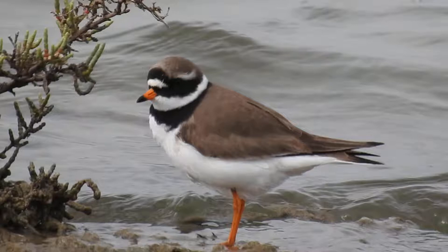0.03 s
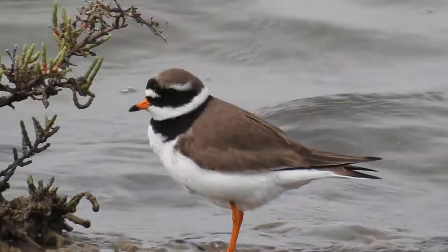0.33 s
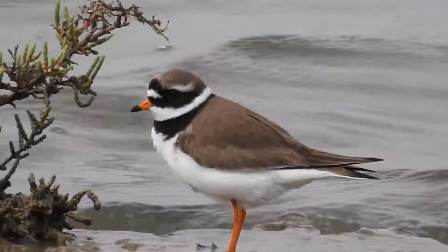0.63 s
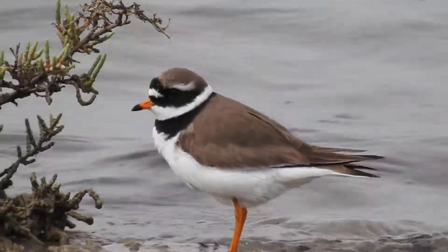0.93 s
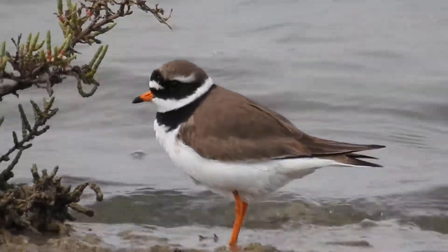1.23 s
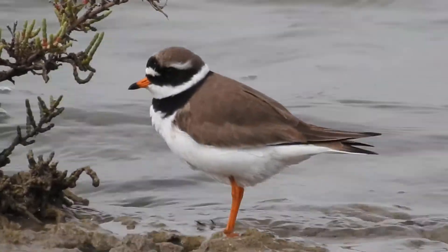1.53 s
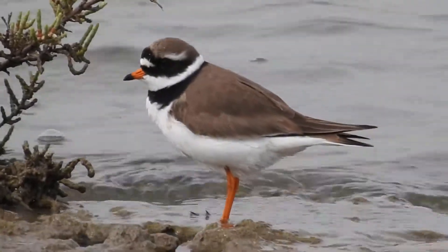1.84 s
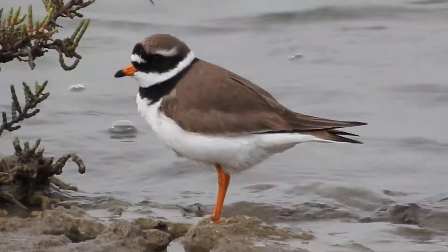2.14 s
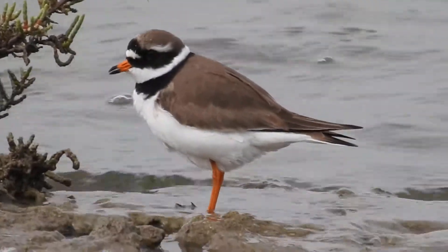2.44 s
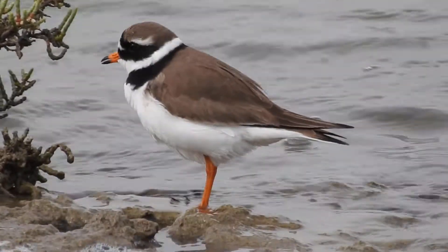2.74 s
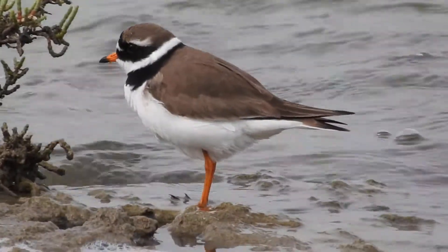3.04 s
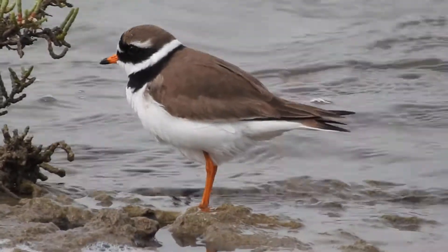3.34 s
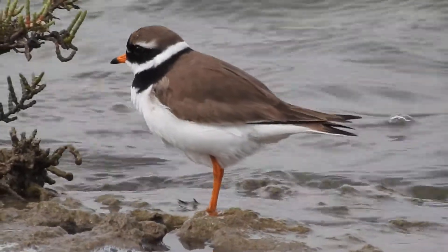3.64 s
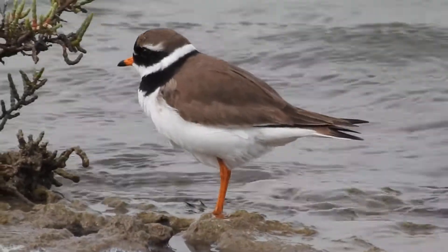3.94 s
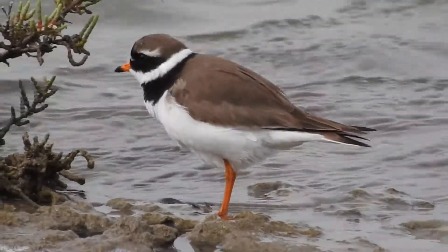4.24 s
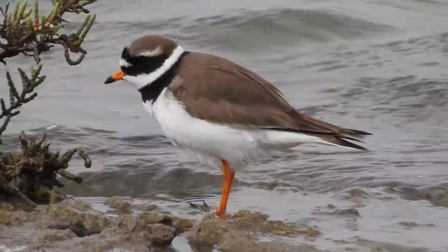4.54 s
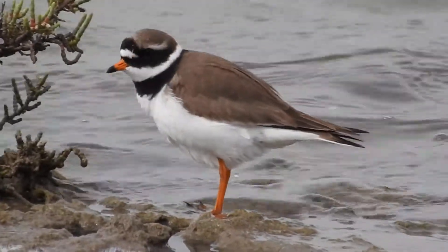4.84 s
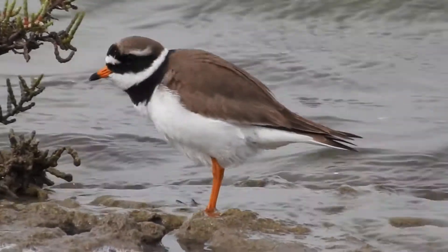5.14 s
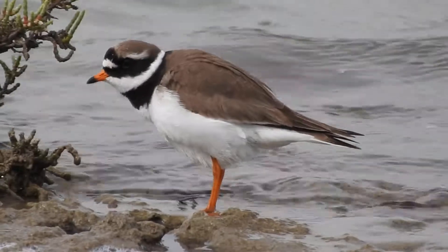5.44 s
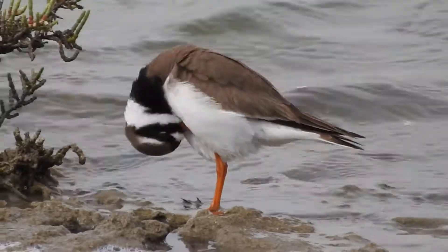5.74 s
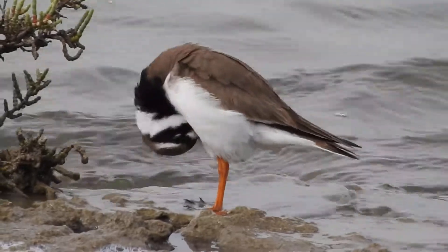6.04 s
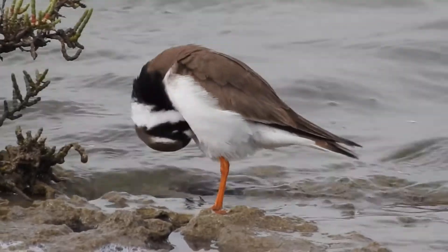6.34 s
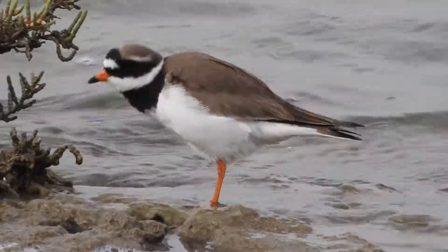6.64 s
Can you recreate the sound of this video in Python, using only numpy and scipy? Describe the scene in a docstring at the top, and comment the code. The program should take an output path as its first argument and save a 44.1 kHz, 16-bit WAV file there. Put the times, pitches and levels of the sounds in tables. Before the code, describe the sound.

Wind buffets the microphone in uneven gusts while wavelets wash a shore and small birds chirp far off.

```python
"""Wind on a shore

Gusts at the two ports of a microphone rumble, flutter, rasp and push a limiter. Hollow knocks sound
during them, and thin dry ticks come with the strongest. Wavelets wash over mud and stones, with ringing
bubbles, fizzing foam and spitting drops. Some way off, small birds chirp, buzz and whistle."""
import sys
import numpy as np
from scipy import signal
from scipy.fft import rfft, irfft, next_fast_len
from scipy.io import wavfile
from scipy.ndimage import uniform_filter1d

SR = 44100
rng = np.random.default_rng(int(sys.argv[2]) if len(sys.argv) > 2 else 0)


def waveform_to_disk(signal):
    """Save audio, clipped to [-1, 1], as 16-bit WAV at the path in sys.argv[1]."""
    frames = np.transpose(np.atleast_2d(signal))
    scaled = np.clip(frames, -1, 1) * 32767
    samples = np.round(scaled).astype(np.int16)
    wavfile.write(sys.argv[1], SR, samples)


N = 298998

# Levels in the tables are relative: each source applies its own gain.
# Gusts at the microphone: start_s, length_s, rumble_db, flutter_re_rumble_db
GUSTS = [(0.067, 0.072, -29, -21), (0.15, 0.052, -11.5, -9), (0.199, 0.114, -16, -0.5),
         (0.321, 0.14, -15, -3), (0.509, 0.029, -18, 0.5), (0.55, 0.07, -15.5, 1),
         (0.773, 0.064, -30.5, -1), (0.822, 0.039, -18, -1.5), (0.87, 0.075, -17, -4),
         (1.221, 0.052, -17.5, -9), (1.461, 0.047, -16, -5.5), (1.518, 0.063, -16.5, -2.5),
         (1.613, 0.058, -16, -8), (1.696, 0.076, -26.5, -2), (1.763, 0.1, -15.5, -9),
         (1.901, 0.14, -14.5, -7), (2.037, 0.067, -26.5, -21), (2.162, 0.078, -34.5, -2.5),
         (2.359, 0.034, -29, -5), (2.423, 0.026, -14.0, -0.5), (2.526, 0.038, -23.5, -9),
         (2.598, 0.05, -12.5, -10), (2.685, 0.1, -22.5, -15), (2.788, 0.05, -10, -13),
         (2.85, 0.036, -10.5, -12.5), (2.946, 0.15, -18.5, -4.5), (3.05, 0.097, -10.5, -9),
         (3.22, 0.056, -21.5, -6), (3.306, 0.085, -23.5, -3), (3.359, 0.029, -11.5, -7.5),
         (3.444, 0.091, -16, -4.5), (3.527, 0.13, -19.5, -4.5), (3.71, 0.062, -20.0, -4.5),
         (3.792, 0.036, -23.5, -7.5), (3.875, 0.057, -20, 0), (4.291, 0.03, -14.5, -5.5),
         (4.346, 0.015, -9.5, -8.5), (4.402, 0.12, -15.5, 0), (4.576, 0.089, -18.0, -0.5),
         (4.686, 0.056, -20.5, -0.5), (4.788, 0.046, -19, -1), (4.847, 0.022, -15.5, -2.5),
         (4.969, 0.023, -25, -13), (5.108, 0.038, -26, -11), (5.193, 0.052, -28.5, -3),
         (5.335, 0.058, -18.5, -5.5), (5.481, 0.019, -22, -8), (5.552, 0.086, -18.5, -10),
         (5.691, 0.02, -25, -12), (5.896, 0.1, -28.5, -1), (6.012, 0.109, -31.0, -6),
         (6.401, 0.021, -20, -25), (6.458, 0.06, -19, -10.5), (6.532, 0.096, -28.5, -9)]
# Short hollow knocks during gusts: start_s, level_db, left_minus_right_db, pitch_hz
KNOCKS = [(0.168, -25, 5, 740), (0.229, -23, -20.5, 945), (0.434, -19, 1, 754), (0.454, -13.5, -18, 1096),
          (0.532, -15.5, -19.5, 790), (0.593, -17.5, -11, 924), (1.633, -21, -12, 660),
          (1.97, -20.5, -2, 940), (2.006, -19, 13, 685), (2.866, -21, -3, 1050), (3.1, -17.5, -20, 1130),
          (3.115, -14, -5, 810), (3.364, -20.5, 6, 634), (3.38, -12.5, -7, 640), (3.624, -16, -16, 680),
          (3.745, -21.5, -3, 690), (3.897, -18, -5, 680), (4.319, -20, 3, 670), (4.364, -15.5, 6.5, 690),
          (4.415, -24, 7, 850), (4.484, -15, 3, 650), (4.649, -18.5, -4, 950), (4.708, -23, 1, 700),
          (4.854, -20.5, -9.5, 1130), (5.361, -27, 2, 974), (5.961, -21, -19, 1045), (6.105, -21, -12, 703)]
# Spectra of the gusts, knocks and ticks: frequency_hz, density_db
RUMBLE_SPECTRUM = [(22, -51), (40, -38), (62, -13.5), (88, -18), (125, -2.5), (165, 3.5), (235, -2.5),
                   (330, -24.5), (520, -26), (1000, -44), (2500, -51), (7000, -78.5)]
FLUTTER_SPECTRUM = [(120, -22), (200, -2), (270, 2.5), (370, -4), (520, -11), (800, -37), (2000, -47),
                    (7000, -74.5)]
RASP_SPECTRUM = [(200, -17), (450, -4.5), (650, 8), (1000, -4), (1400, -10), (2500, -17.5), (4000, -31),
                 (5200, -56), (15000, -57)]
KNOCK_SPECTRUM = [(150, -13.5), (400, 4), (700, 3), (1150, -3), (1600, -20), (4000, -24.5), (5000, -32),
                  (15000, -50)]
CRACKLE_SPECTRUM = [(300, -8.5), (3800, 3), (4800, -19), (8000, -8), (12500, -6.5), (15500, -17)]

# Slow swell of the wash and of its foam: time_s, level_db
WASH_LEVELS = [(0.7, -42), (0.8, -40.5), (1.97, -41.5), (2.29, -41), (4.7, -43), (4.95, -43.5),
               (6.78, -43.5)]
FOAM_LEVELS = [(0.3, -48), (1.3, -47.5), (2.8, -48.5), (4.6, -48), (5.75, -46.5), (6.78, -47)]
# Spectra of the water noises: frequency_hz, density_db
WASH_SPECTRUM = [(30, -18), (90, 1.5), (160, 2), (300, 1), (550, 0.5), (1000, -6), (1750, -9), (2300, -16),
                 (3300, -18.5), (4200, -21.5), (7000, -50)]
FIZZ_SPECTRUM = [(2000, -9), (3300, -10), (3900, -16.5), (4500, -0.5), (5300, 0), (6500, 3.5), (7300, -2),
                 (8300, -9.5), (10000, -17), (15500, -33)]
# Likeness of the water's sound at the two ports: frequency_hz, correlation
PORT_CORRELATION = [(60, 0.71), (150, 0.24), (300, 0.99), (640, 0.94), (1400, 0.91), (3100, 0.75),
                    (4500, 0.48), (6800, -0.22), (9000, -0.27), (15000, 0.3)]
# Drops spitting at the water's edge: start_s, level_db
DROPS = [(1.704, -35), (1.884, -37), (3.716, -32), (3.724, -36), (3.758, -30.5), (3.995, -32), (4.214, -35),
         (5.387, -31), (5.568, -33), (5.654, -39)]

# Short rising pips: start_s, pitch_hz, level_db
PIPS = [(0.125, 4250, -41.5), (0.13, 3650, -47), (0.436, 4150, -40.5), (0.864, 4300, -41.5),
        (0.972, 3550, -42), (2.606, 5600, -34.5), (3.87, 4500, -41), (4.145, 4250, -34.5),
        (5.199, 4280, -38.5), (5.307, 3650, -44.5), (5.737, 4250, -38.5), (5.965, 4320, -39.5),
        (6.06, 4150, -49), (6.243, 4300, -44), (6.34, 4120, -42), (6.417, 3420, -47), (6.52, 4280, -33),
        (6.628, 4060, -39)]
# Calls on two tones: start_s, length_s, lower_hz, upper_hz, level_db, upper_re_lower_db, buzz_depth_hz
TWO_TONE_CALLS = [(0.634, 0.0465, 5450, 6720, -43.5, 9, 403), (0.691, 0.045, 3530, 4570, -40, -7, 120),
                  (0.781, 0.047, 5300, 6560, -39.5, 4.5, 376), (1.775, 0.042, 3650, 4800, -42.5, -6, 0),
                  (2.295, 0.044, 5270, 6070, -49, 5, 0), (5.797, 0.051, 4600, 6240, -49, 4, 0),
                  (6.186, 0.031, 5380, 6330, -45.5, 6, 0), (6.465, 0.027, 5300, 6250, -38, 1, 0)]
# Gliding whistles: start_s, length_s, start_hz, end_hz, level_db, buzz_depth_hz
WHISTLES = [(0.235, .18, 4500, 4920, -48.5, 2), (0.457, .02, 3560, 3400, -43, -12),
            (0.608, .035, 5900, 5220, -41, 100), (0.996, 0.2, 7300, 5220, -37.5, 377),
            (1.935, .081, 4020, 4110, -40.5, 5), (2.612, .051, 5846, 5716, -26.5, 0),
            (2.63, 0.11, 5740, 5600, -39, -4), (4.268, 0.045, 3850, 3730, -49, 4),
            (4.679, 0.013, 2750, 2470, -38, 0), (5.83, 0.072, 4620, 5070, -51, 0),
            (6.265, 0.033, 6200, 4450, -41, -2), (6.497, 0.037, 6270, 6200, -42, 0)]


def wind(rumble_db=0.5, lumpy_db=2.5, flicker_db=3.5):
    """Turbulent pressure: each port has its own eddies under the same gusts; large ones rumble."""
    rumble_level, flutter_level = gust_levels()
    push = rumble_level * from_db(rumble_db + lumpy_db * drift(25))
    rumble = push * evened(coloured(rng.standard_normal((2, N)), RUMBLE_SPECTRUM), span_s=0.029)
    flutter = evened(coloured(rng.standard_normal((2, N)), FLUTTER_SPECTRUM), span_s=0.034)
    flutter *= flutter_level * from_db(flicker_db * drift(21))
    return rumble + flutter + rasp(flutter_level) + knocks() + crackle(push)


def gust_levels(attack_s=0.022, decay_s=0.02, breeze_db=-42.5, swing_db=6, breeze_flutter_db=-7):
    """Incoherent addition: gusts and breeze sum in power, giving large- and small-eddy amplitudes."""
    t = np.arange(N) / SR
    rumble_power = from_db(breeze_db + swing_db * np.clip(drift(3.4), -2, 2)) ** 2
    flutter_power = rumble_power * from_db(breeze_flutter_db) ** 2
    for start_s, length_s, rumble_db, flutter_db in GUSTS:
        age = t[:int((length_s + 8 * decay_s) * SR)]
        rise = np.minimum(age / attack_s, 1)
        fall = np.exp(-np.maximum(age - length_s, 0) / decay_s)
        push = from_db(rumble_db) * rise * fall
        add(rumble_power, start_s, push ** 2)
        add(flutter_power, start_s, (push * from_db(flutter_db)) ** 2)
    return np.sqrt(rumble_power), np.sqrt(flutter_power)


def rasp(flutter_level, rasp_db=-34, reference_db=-17.5, exponent=1.08, burst_db=3.5):
    """Intermittency: the smallest eddies tear at each port in bursts, by a power law of the flutter."""
    bursts = from_db(burst_db * np.array([drift(59), drift(58)]))
    level = from_db(rasp_db) * (flutter_level / from_db(reference_db)) ** exponent
    return level * coloured(rng.standard_normal((2, N)) * bursts, RASP_SPECTRUM)


def knocks(tone_db=-5.0, noise_db=-41.0, rise_s=0.0036):
    """Tone bursts: short hollow knocks during gusts, each a few cycles of tone inside a burst of noise."""
    t = np.arange(SR // 25) / SR
    tones, bursts = np.zeros((2, 2, N))
    for start_s, level_db, pan_db, pitch_hz in KNOCKS:
        port_db = level_db + pan_db * np.array([[.5], [-.5]]) - abs(pan_db) / 4
        envelope = pulse(t / rise_s) * from_db(port_db)
        add(tones, start_s, envelope * np.sin(2 * np.pi * (pitch_hz * t + rng.random((2, 1)))))
        add(bursts, start_s, envelope * rng.standard_normal((2, len(t))))
    return from_db(tone_db) * tones + from_db(noise_db) * coloured(bursts, KNOCK_SPECTRUM)


def crackle(push, max_per_s=260, full_push_db=-14.5, spread_db=5.5, level_db=-65.0):
    """Random impulses: thin dry ticks come with the strongest gusts."""
    chance = max_per_s / SR * np.minimum(push / from_db(full_push_db), 1) ** 4
    sizes = from_db(spread_db * np.clip(rng.standard_normal((2, N)), -2, 2))
    signs = rng.choice([-1, 1], (2, N))
    ticks = sizes * signs * (rng.random((2, N)) < chance)
    return from_db(level_db) * coloured(ticks, CRACKLE_SPECTRUM)


def water(wash_db=8.0, lap_db=-8.5, prickle_db=-9.0):
    """Superposition: many wavelets merge into a wash and their foam into a fizz; near bubbles ring."""
    wash = from_db(wash_db + 1.08 * drift(2.64)) * diffuse(WASH_SPECTRUM)
    laps = from_db(lap_db) * bubbles(low_hz=426, high_hz=2220, cycles=44, spread_db=10, count=800)
    fizz = from_db(.5 * drift(11)) * diffuse(FIZZ_SPECTRUM)
    prickle = from_db(prickle_db) * bubbles(low_hz=2355, high_hz=6970, cycles=50, spread_db=2.5, count=1100)
    return gain_curve(WASH_LEVELS) * (wash + laps) + gain_curve(FOAM_LEVELS) * (fizz + prickle)


def diffuse(spectrum):
    """Spatial coherence: a broad front's noise is largely alike at both ports, except in short waves."""
    size = next_fast_len(N)
    correlation = np.clip(at_hz(PORT_CORRELATION, np.fft.rfftfreq(size, 1 / SR)), -.98, .98)
    mid, side = rfft(rng.standard_normal((2, size)))
    pair = np.sqrt(1 + correlation) * mid + np.sqrt(1 - correlation) * side * [[1], [-1]]
    return coloured(irfft(pair, size)[:, :N], spectrum)


def bubbles(low_hz, high_hz, cycles, spread_db, count):
    """Damped resonance: each bubble rings briefly, rising in pitch as it nears the surface; rms 1."""
    out = np.zeros((2, N))
    for when, size, strength, where in rng.random((count, 4)):
        start_hz = low_hz * (high_hz / low_hz) ** size
        life = np.linspace(0, 1, int(cycles / start_hz * SR) + 2)
        envelope = life * from_db(-70 * life)
        ring = np.sin(2 * np.pi * cycles * life * (1 + .12 * life))
        level_db = -spread_db * np.log(max(strength, .05))  # many faint, few loud
        pan_db = (1 - where) * np.array([[-4], [4]])  # centre to right
        add(out, when * N / SR, ring * envelope * from_db(level_db + pan_db))
    return rms_one(out)


def drops(gain_db=3.0, rise_s=.004, band_hz=(5200, 7500)):
    """Noise transients: each drop bursts in a bright, band-limited spit of a few milliseconds."""
    out = np.zeros((2, N))
    envelope = pulse(np.arange(SR // 16) / SR / rise_s)
    for start_s, level_db in DROPS:
        spit = envelope * rng.standard_normal((2, len(envelope)))
        add(out, start_s, from_db(level_db + gain_db) * spit)
    band = signal.butter(2, band_hz, "band", fs=SR, output="sos")
    return signal.sosfilt(band, signal.sosfilt(band, out + 1e-18))


def birds(gain_db=-1.5, ground_db=-9.5, ground_s=.007, scatter_db=-6.5, t60_s=.32, port_lag_s=.00004):
    """Multipath propagation: calls come from one side, echo off the ground and scatter in the bushes."""
    t = np.arange(N) / SR
    calls = far_chirps() + song() + twitter()
    calls += from_db(ground_db) * np.interp(t - ground_s, t, calls)
    at_ports = np.array([np.interp(t - port_lag_s, t, calls), calls])
    delay_s = t[:SR // 2]
    echoes = rng.standard_normal((2, len(delay_s))) * from_db(-60 * delay_s / t60_s)
    echoes /= np.sqrt(np.sum(echoes[0] ** 2))
    tail = signal.fftconvolve(calls[None], echoes, axes=1)[:, :N]
    return from_db(gain_db) * (at_ports + from_db(scatter_db) * tail)


def song(pip_s=.0244, scoop=.93, upper_lag_s=.0047):
    """Pitch glides: the nearer birds sing rising pips, two-tone calls that scoop up, and whistles."""
    calls = np.zeros(N)
    for start_s, hz, db in PIPS:
        add(calls, start_s, note(pip_s, .88 * hz, hz, 1.06 * hz, db))
    for start_s, length_s, lower_hz, upper_hz, db, upper_db, buzz_hz in TWO_TONE_CALLS:
        lower = note(length_s, scoop * lower_hz, lower_hz, lower_hz, db, buzz_hz)
        upper = note(length_s, scoop * upper_hz, upper_hz, upper_hz, db + upper_db, buzz_hz)
        add(calls, start_s, lower)
        add(calls, start_s + upper_lag_s, upper)
    for start_s, length_s, start_hz, end_hz, db, buzz_hz in WHISTLES:
        add(calls, start_s, note(length_s, start_hz, (start_hz + end_hz) / 2, end_hz, db, buzz_hz))
    return calls


def twitter(start_s=1.218, period_s=.0715, count=7, middle_db=-44, step_db=1):
    """A pulse train: one bird's evenly spaced falling ticks swell and fade."""
    calls = np.zeros(N)
    for k in range(count):
        level_db = middle_db - step_db * abs(k - count // 2) + rng.normal(0, 1.7)
        add(calls, start_s + k * period_s, note(.024, 5400, 4500, 3700, level_db))
    return calls


def note(length_s, start_hz, middle_hz, end_hz, level_db, buzz_hz=0, trill_hz=125, waver_hz=45):
    """Frequency modulation: a fast trill of the syrinx puts a buzz on a wavering, gliding tone."""
    t = np.arange(int(length_s * SR)) / SR
    u = t / length_s
    arch_hz = start_hz * (1 - u) * (1 - 2 * u) + 4 * middle_hz * u * (1 - u) + end_hz * u * (2 * u - 1)
    waver = np.interp(t * 600, np.arange(200), rng.standard_normal(200))
    trill = np.sin(2 * np.pi * (trill_hz * t + rng.random()))
    phase = 2 * np.pi * np.cumsum(arch_hz + buzz_hz * trill + waver_hz * waver) / SR
    return np.sqrt(2) * from_db(level_db) * signal.windows.tukey(len(t), .7) * np.sin(phase)


def far_chirps(count=36, level_db=-55.0, low_hz=3000, high_hz=5500):
    """Linear sweeps: birds further off slip in faint rising and falling chirps at random times."""
    calls = np.zeros(N)
    for when, height, slope, span in rng.random((count, 4)):
        hz = low_hz + (high_hz - low_hz) * height
        glide_hz = .2 * (slope - .5) * hz
        chirp = note(.018 + .025 * span, hz - glide_hz, hz, hz + glide_hz, level_db, buzz_hz=90)
        add(calls, when * N / SR, chirp)
    return calls


def from_db(db):
    """Decibels as an amplitude ratio."""
    return 10 ** (np.asarray(db) / 20)


def rms_one(x):
    """Normalisation to an rms of 1."""
    return x / np.sqrt(np.mean(x ** 2) + 1e-20)


def evened(x, span_s):
    """Envelope normalisation: the short-term rms is held at 1."""
    return x / np.sqrt(uniform_filter1d(x ** 2, int(span_s * SR)) + 1e-9)


def pulse(age):
    """Rayleigh envelope, peaking at 1 when age is 1."""
    return age * np.exp((1 - age ** 2) / 2)


def gain_curve(levels):
    """Interpolation in decibels: a gain for every sample."""
    time_s, level_db = np.transpose(levels)
    return from_db(np.interp(np.arange(N) / SR, time_s, level_db))


def at_hz(points, hz):
    """Interpolation on a log-frequency axis."""
    known_hz, values = np.transpose(points)
    return np.interp(np.log(hz + 1), np.log(known_hz), values)


def coloured(x, spectrum):
    """Spectral shaping by multiplication in the frequency domain; rms 1."""
    size = next_fast_len(N + 8192)
    gain = from_db(at_hz(spectrum, np.fft.rfftfreq(size, 1 / SR)))
    return rms_one(irfft(rfft(x, size) * gain, size)[..., :N])


def drift(corner_hz, hop=20):
    """Low-pass noise: a slow random wander of rms 1."""
    pole = np.exp(-2 * np.pi * corner_hz * hop / SR)
    noise = rng.standard_normal(N // hop + 4002)
    slow = signal.lfilter([1], [1, -2 * pole, pole * pole], noise)[4000:]
    return np.interp(np.arange(N) / hop, np.arange(len(slow)), rms_one(slow))


def add(track, start_s, sound):
    """Superposition of a short sound on a track."""
    start = int(np.clip(start_s * SR, 0, N - 1))
    track[..., start:start + sound.shape[-1]] += sound[..., :N - start]


def scene():
    """Pressures add: wind on the ports, water in front, birds beyond."""
    return wind() + water() + drops() + birds()


def record(dry, ceiling_db=-5.5, release_db_per_s=300, attack_s=0.0003, cutoff_hz=15650):
    """Peak limiting: the sound opens after a moment, gusts are held down and the top treble is cut."""
    t = np.arange(N) / SR
    opened = dry * np.interp(t, [.083, .092], [.002, 1])
    over_db = np.maximum(20 * np.log10(np.abs(opened) + 1e-9) - ceiling_db, 0)
    held_db = np.maximum.accumulate(over_db + release_db_per_s * t, axis=1) - release_db_per_s * t
    pole = np.exp(-1 / (attack_s * SR))
    cut_db = signal.lfilter([1 - pole], [1, -pole], held_db)
    low_pass = signal.ellip(12, .1, 90, cutoff_hz, fs=SR, output="sos")
    return signal.sosfilt(low_pass, opened * from_db(-cut_db))


dry = scene()
out = record(dry)
waveform_to_disk(out)
```